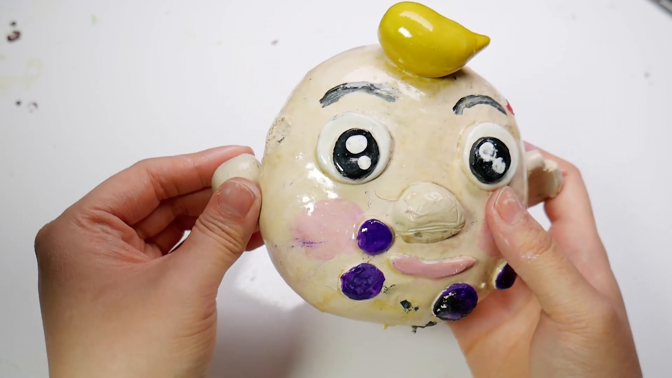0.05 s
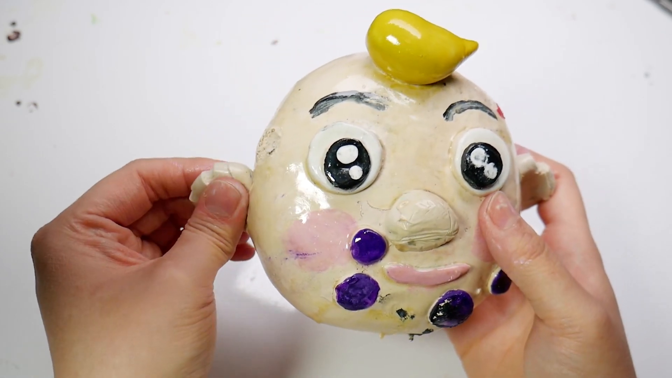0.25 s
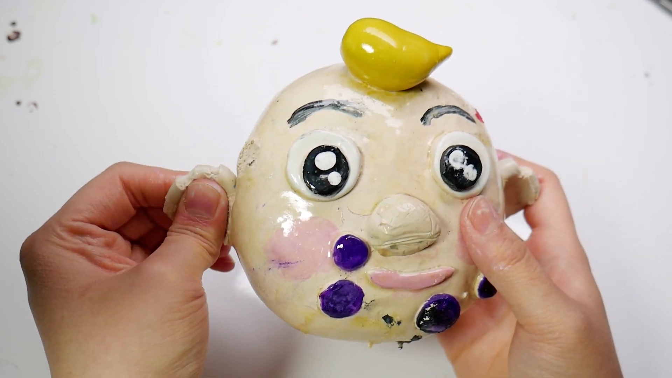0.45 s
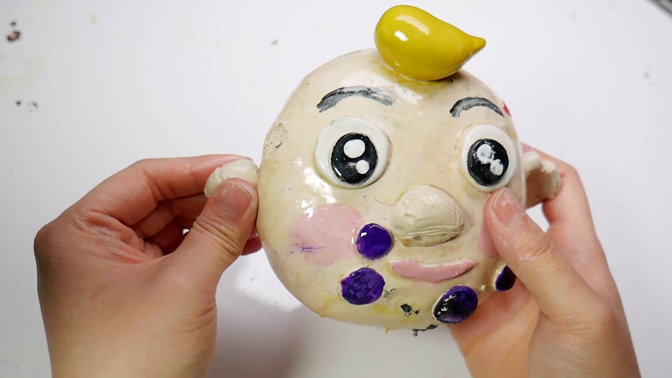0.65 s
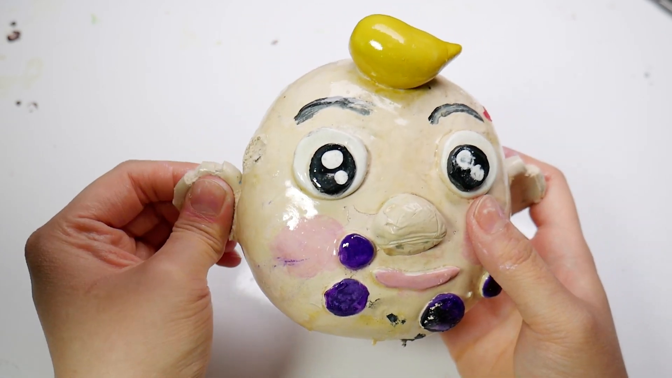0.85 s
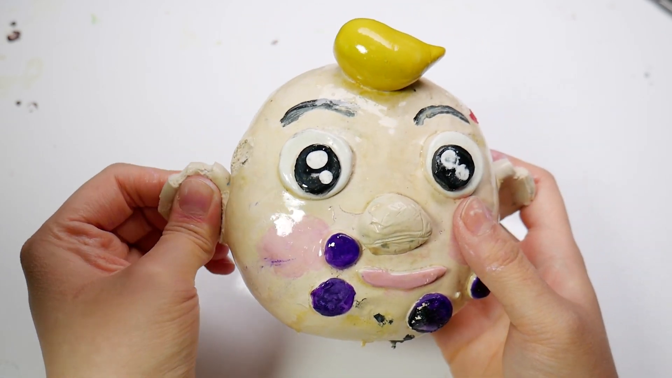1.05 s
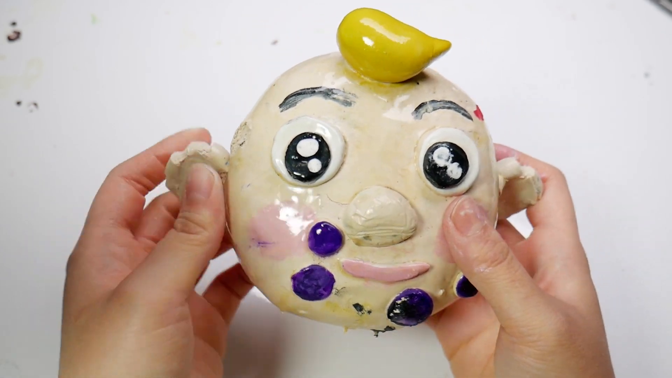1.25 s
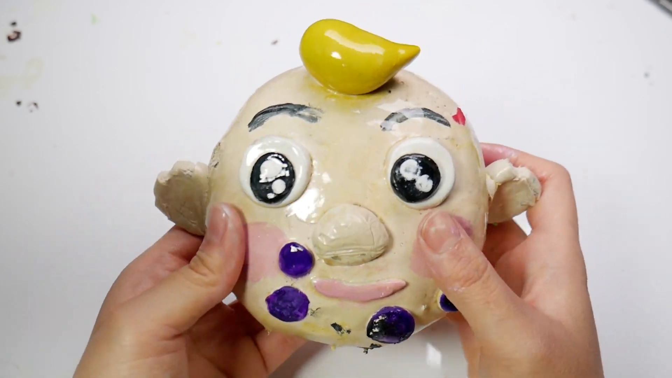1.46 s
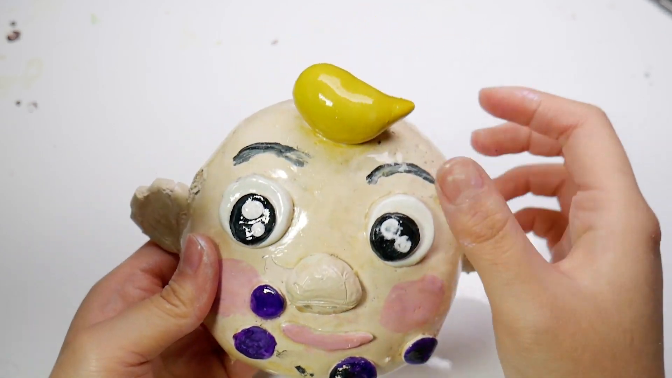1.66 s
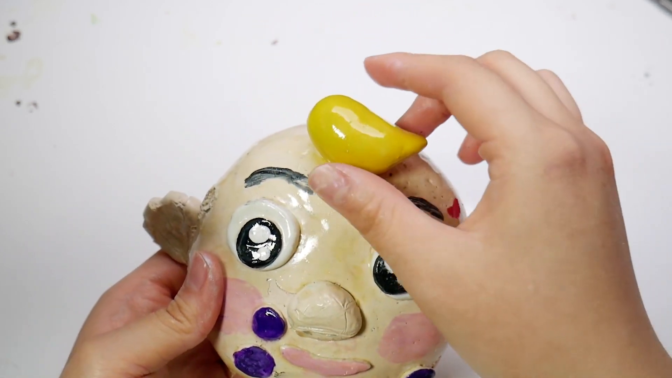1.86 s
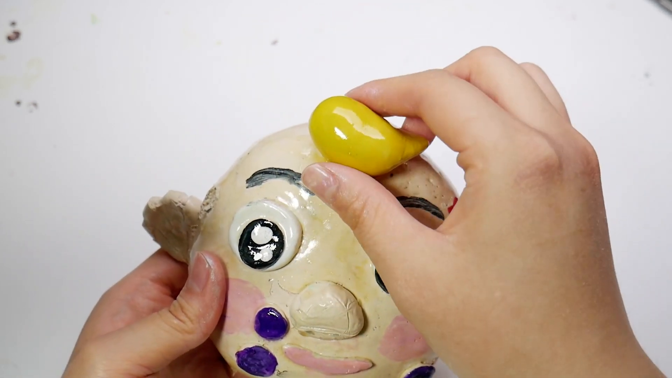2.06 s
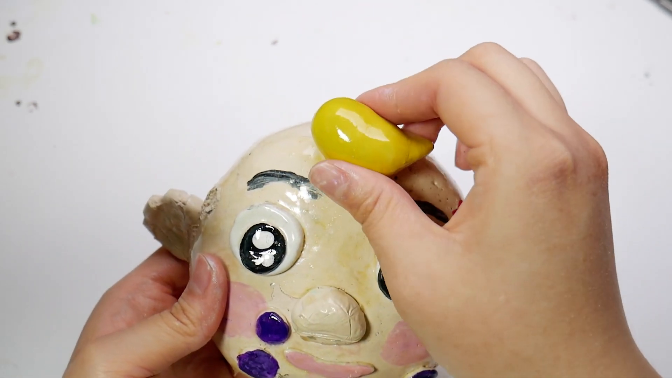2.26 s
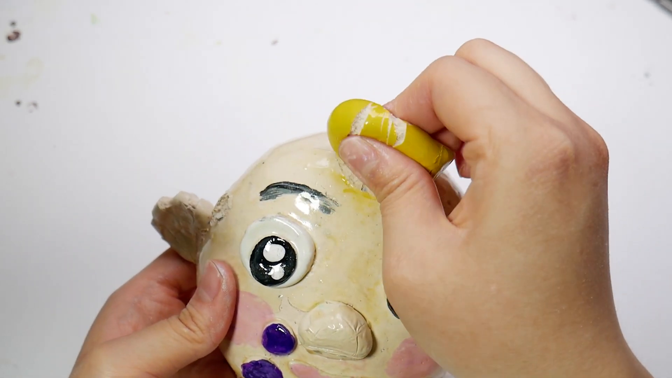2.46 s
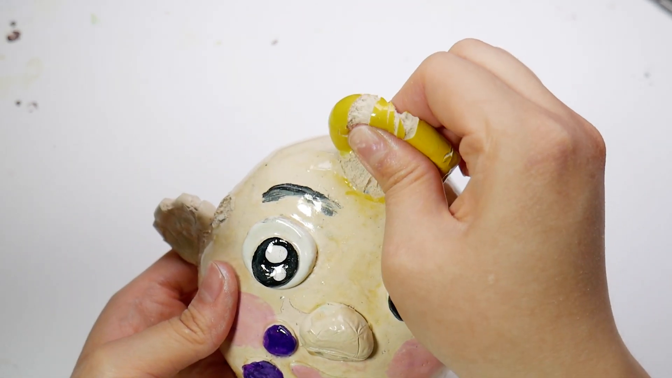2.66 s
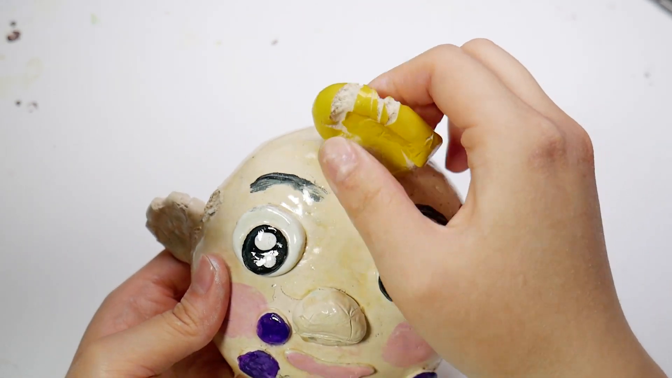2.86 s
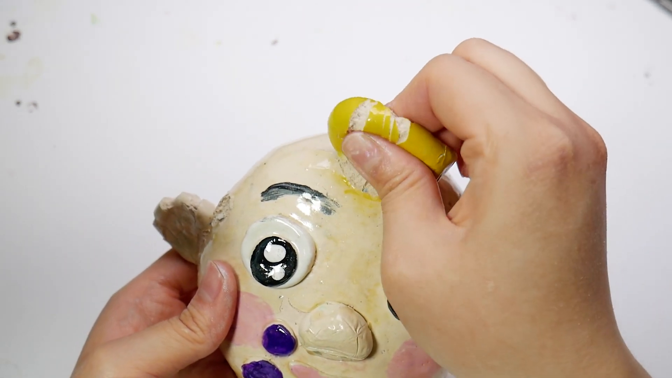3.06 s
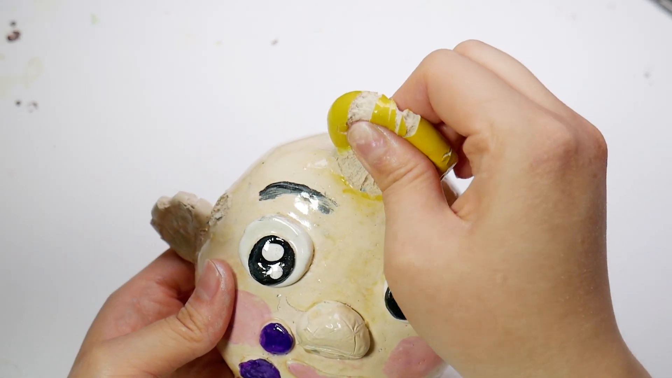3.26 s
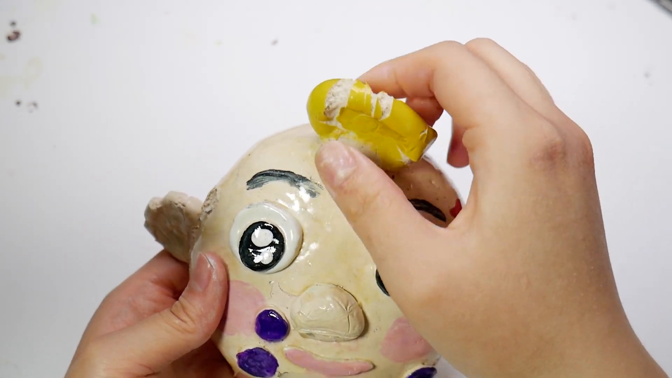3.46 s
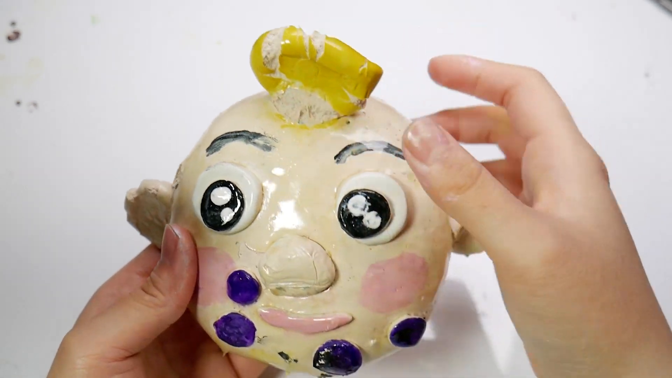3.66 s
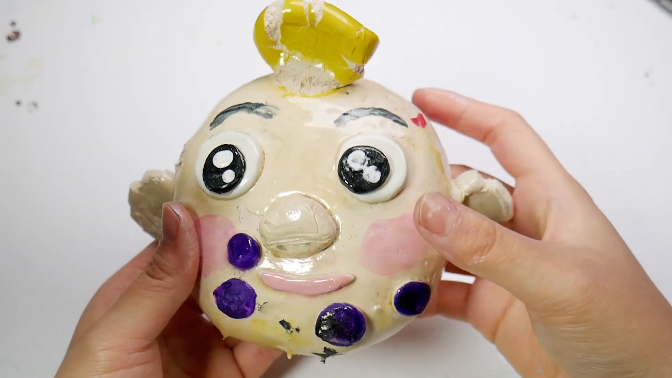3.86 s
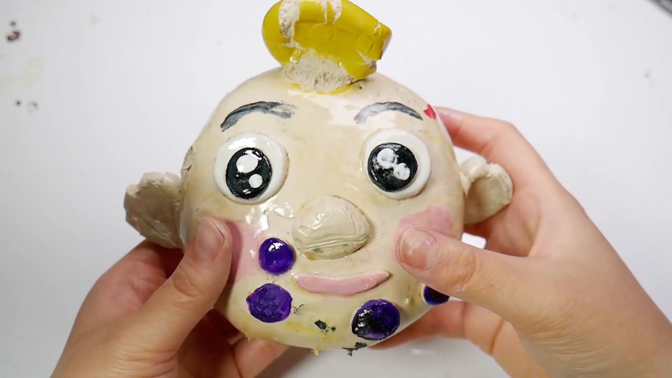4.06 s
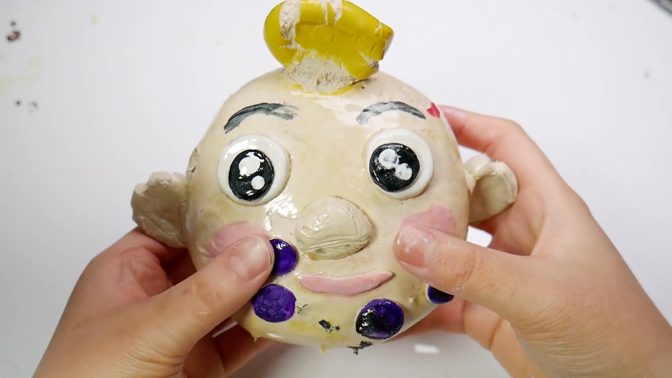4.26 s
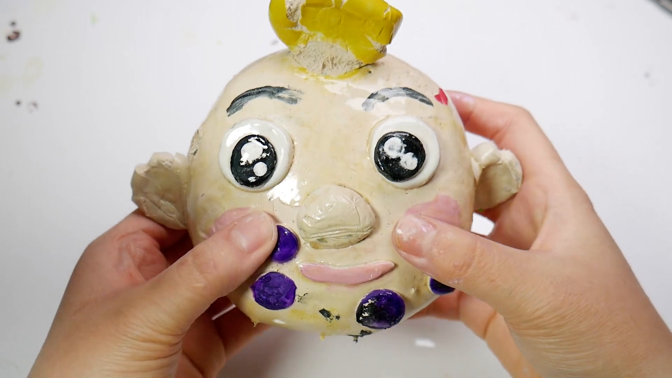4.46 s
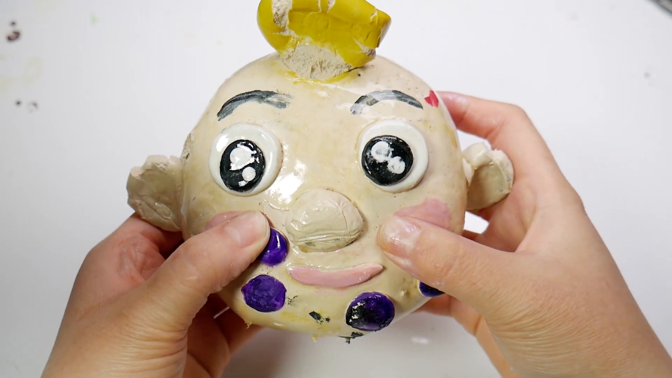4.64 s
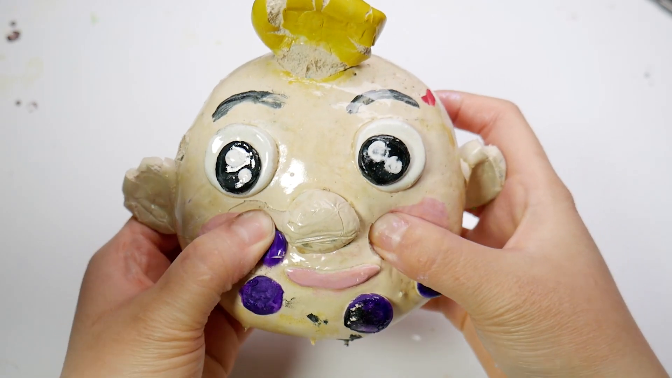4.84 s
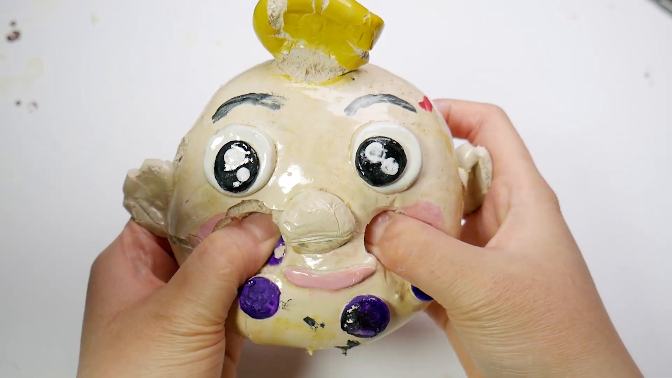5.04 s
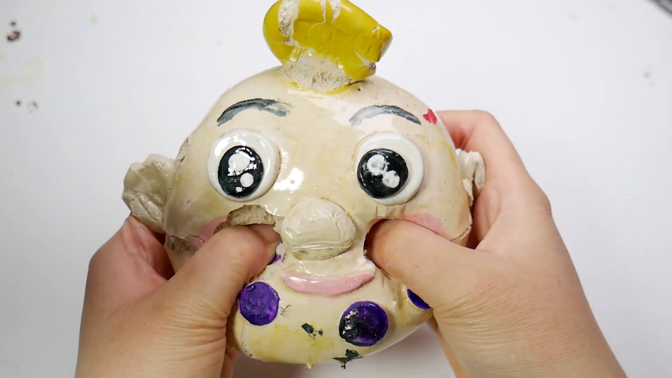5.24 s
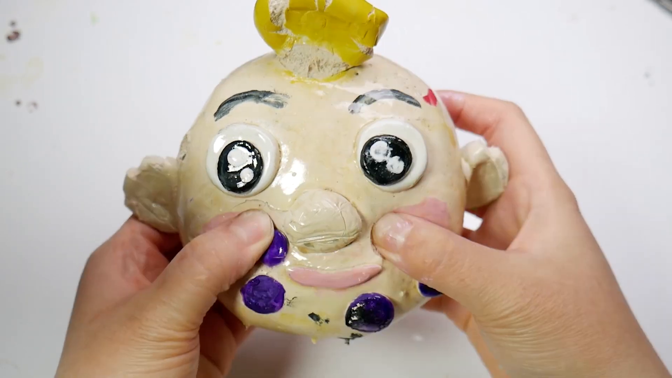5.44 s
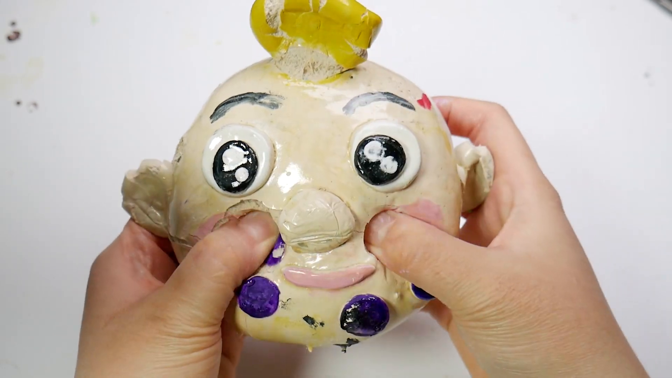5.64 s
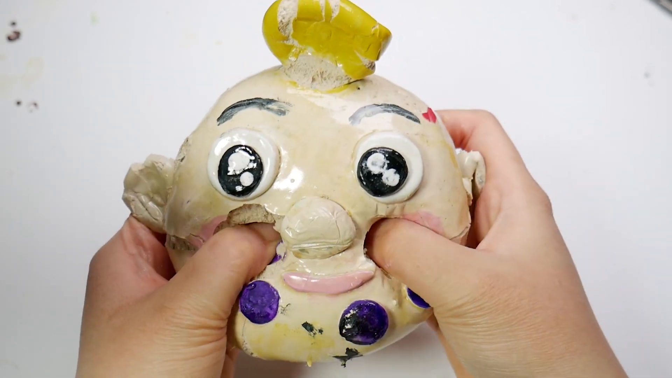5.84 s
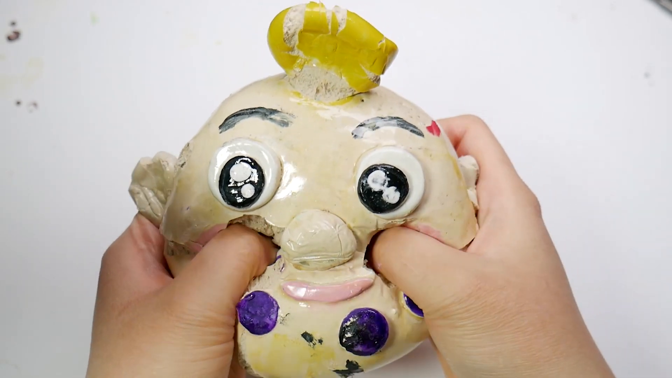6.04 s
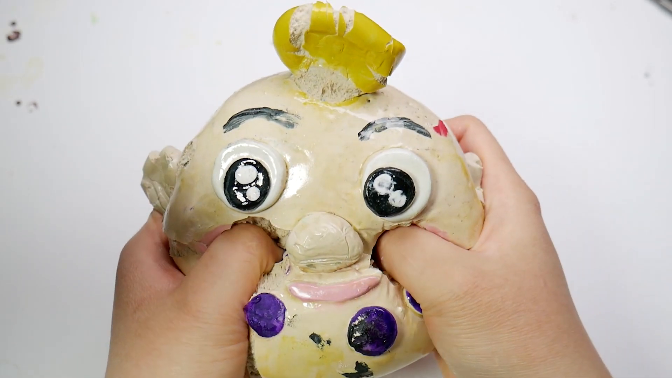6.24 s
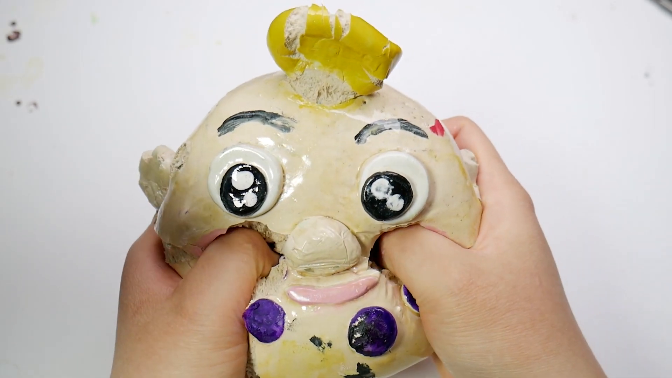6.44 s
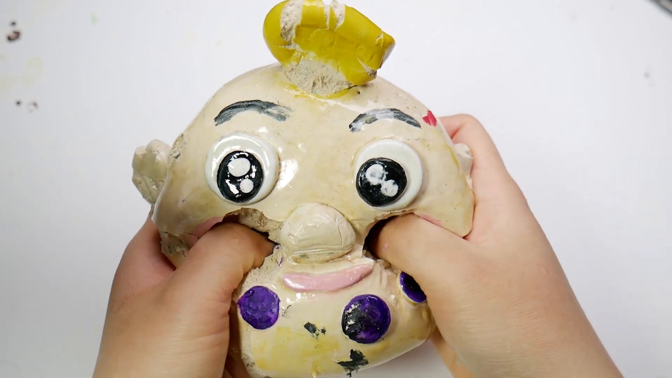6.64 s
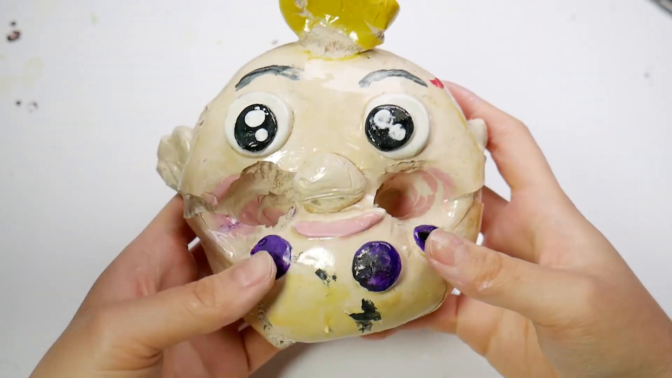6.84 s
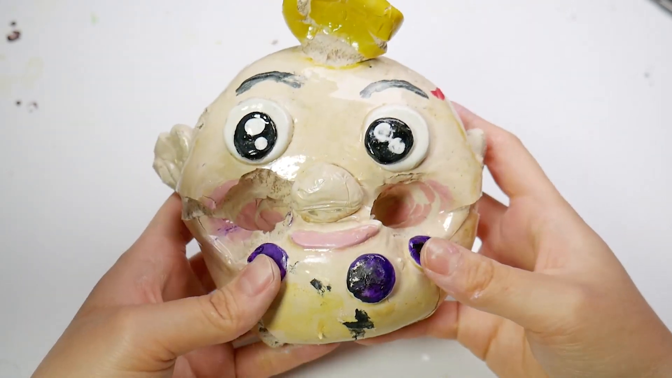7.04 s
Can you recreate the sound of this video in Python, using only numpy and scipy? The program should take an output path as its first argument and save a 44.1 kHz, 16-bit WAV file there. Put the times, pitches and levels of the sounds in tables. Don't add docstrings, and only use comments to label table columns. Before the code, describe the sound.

Brittle clay cracks right at the microphone, dry and overloaded at the loudest snaps. Two bursts of crisp crunching, the second heavier, are separated by small clicks and soft thuds. A quieter stretch of handling and low room hiss follows, then a long, dense crunch with woody, hollow knocks from the softer core, a brief pause, another crackling burst and sparse ticking crumbs.

```python
import sys
import numpy as np
from scipy import signal
from scipy.fft import rfft, irfft
from scipy.io import wavfile
from scipy.ndimage import uniform_filter1d

SR = 44100
rng = np.random.default_rng(int(sys.argv[2]) if len(sys.argv) > 2 else 0)


def attenuation_scalar(level_db):
    decades = np.asarray(level_db, float) / 20
    return 10 ** decades


def pcm_store(signal):
    levels = np.round(np.clip(np.atleast_2d(signal), -1, 1) * 32767)
    wavfile.write(sys.argv[1], SR, levels.astype(np.int16).T)


N = 313110
T = np.arange(N) / SR
HOLLOW_HZ, HOLLOW_WIDTH_HZ = 830, 130


def band(x, hz, width):
    return signal.lfilter(*signal.iirpeak(hz, hz / width, fs=SR), x)


def body(x, modes):
    return sum((-1) ** k * attenuation_scalar(db) * band(x, hz, width) for k, (hz, width, db) in enumerate(modes))


def treble(x, hz):
    return signal.sosfilt(signal.butter(N=3, Wn=hz, btype="high", fs=SR, output="sos"), x)


def unit(x):
    return x / np.sqrt(np.mean(x ** 2))


def top(x):
    return x / np.max(np.abs(x), axis=-1, keepdims=True)


def fade(t, t60):
    return np.exp(-np.log(1000) * t / t60)


def add_at(starts_s, sounds):
    size = sounds.shape[-1]
    out = np.zeros(N + size)
    places = (starts_s * SR).astype(int)[:, None] + np.arange(size)
    np.add.at(out, places, sounds)
    return out[:N]


# pitch_hz, density_db (per Hz)
AIR = [(28, -23), (60, -9), (130, 0), (200, -8), (300, -4), (500, -14.5), (3300, -16.5), (9000, -34.5)]
# start_s, level_db
AIR_DB = [
    (0, -51),
    (3.45, -54.5),
    (3.55, -56.5),
    (7.1, -51),
]


def air():
    hz = np.maximum(np.fft.rfftfreq(N, 1 / SR), 1)
    colour_hz, colour_db = np.transpose(AIR)
    colour = attenuation_scalar(np.interp(np.log(hz), np.log(colour_hz), colour_db))
    tone = unit(irfft(rfft(rng.standard_normal(N)) * colour, N))
    hiss = rng.standard_normal((2, N))
    return (tone + hiss) * attenuation_scalar(np.interp(T, *np.transpose(AIR_DB)))


# start_s, thump_db (at a 0 dB crack), grit_db and core_db (over the shell)
GRIPS = [(0, -18, 0, -6), (.35, -25, -2, -11), (1.09, -19, 5, -8), (1.265, -11, 2, -2), (1.42, -8, -4, -3),
         (1.63, -8, -15, -8), (2.3, -21, -2, -14), (2.59, -29, 5, -15), (2.72, -22, 4, -7),
         (3.49, -8, -18, -14), (3.7, -8, -3, -4), (4.5, -15, -8, -4), (4.69, -26, -8, -4),
         (4.78, -22, -6.5, 0), (6.08, -26, -5, -2), (6.14, -26, 1, 0), (6.56, -14, 1, 0),
         (6.62, -14, -7, -5), (6.86, -12, -22, -1)]


def grip(s):
    table = np.array(GRIPS)
    row = np.maximum(np.searchsorted(table[:, 0], s) - 1, 0)
    return table[row, 1:].T


def thumps_db():
    s, shard_db, hz, _ = CRACKS.T
    return grip(s)[0] + 1.05 * shard_db - 2.5 * np.log2(hz / 2800)


# pitch_hz, width_hz, level_db
SHELL = [(1944, 1190, 4.5), (2856, 730, 4), (3450, 630, 2), (4530, 5400, -4)]
# pitch_hz, width_hz, level_db
CORE = [(97, 233, -12), (312, 336, -2.5), (518.5, 279, 0.5), (860, 400, -2.5)]


def fracture(shard_db, hz, snap_db, thump_db, chance):
    t = np.arange(chance.shape[-1]) / SR
    size = attenuation_scalar(0.74 * shard_db)
    kick = t == 0
    run = chance[0] * fade(t, 0.007 * size) + 4.0 * kick
    ring = np.array([band(r, f, f / 3.9) for r, f in zip(run, hz)])
    shard = top(ring) + 0.33 * top(body(run, SHELL))
    shard = treble(shard, 1000)
    burst = chance[1] * fade(t, 0.003 * size + 0.0012)
    snap = treble(band(burst, 8500, 15000), 5100)
    thump = body(chance[2] * fade(t, 0.0054) + 3.3 * kick, CORE)
    return attenuation_scalar(shard_db) * top(shard) + attenuation_scalar(thump_db) * top(thump) + attenuation_scalar(snap_db) * top(snap)


# start_s, shard_db (peak), ring_hz, snap_db (peak)
EAR = [(.1512, -1, 4340, -1), (.1897, 6, 3770, 4.5), (.201, -6, 3350, 6), (.2112, -3, 3600, 4),
       (.2088, -8, 3600, -4), (.217, -20, 3600, -9), (.2288, -11, 3600, -15), (.251, -3, 3100, 4),
       (.2614, -6, 3450, 8), (.271, -17, 5700, 4), (.2797, -15, 3300, -7), (.283, -2.5, 3450, 8.5),
       (.2912, -10, 2610, 0), (.2939, -6, 3700, -33), (.3032, 1, 3330, 1), (.3219, -7, 3300, 8),
       (.3449, -1, 3300, 5), (.3553, -12, 3320, -6), (.359, -7, 3620, 1), (.392, -35, 3510, -4),
       (.3945, -11, 3470, -2), (.4014, -22, 3420, -1.5), (.403, -12, 3490, -5), (.4258, -16, 3510, -9),
       (.4308, 2, 3450, 6), (.449, -32, 3150, -10), (.4655, -18, 3450, -3), (.4815, -6.5, 2650, 8),
       (.5118, -16.5, 2690, -2.5), (.5348, -40, 3530, -20)]
# start_s, shard_db, ring_hz, snap_db
HANDLING = [(1.1206, -18, 3700, -11.5), (1.2035, -35, 5640, -23), (1.2329, -30, 4780, -20),
            (1.2394, -27, 2610, -10), (1.2722, -12, 5300, -14), (1.2811, -12, 4350, -6),
            (1.2842, -7, 5100, 1.5), (1.3308, -4, 5360, -1), (1.4577, -17, 3370, -22),
            (1.4699, -16.5, 1610, -16), (1.4958, -23, 2070, -41), (1.5293, -8.5, 1600, -34),
            (1.5489, -16, 2170, -22), (2.3147, -33, 1810, -36)]
# start_s, shard_db, ring_hz, snap_db
TUFT = [(2.3425, -19, 3190, -14), (2.3475, -9, 1820, -1), (2.362, -3.5, 1920, 5), (2.3755, -16, 2070, -10),
        (2.3845, 11.5, 1870, 5), (2.4029, 8.5, 1870, 6.5), (2.4386, 1.5, 1800, 4), (2.452, -8, 4720, -12),
        (2.4549, 9, 3070, 3), (2.4656, 4.5, 3150, 4.5), (2.4693, 6, 3960, 8), (2.477, -1, 1820, -14),
        (2.4811, 0, 3300, -25), (2.4845, -2, 3340, -7.5), (2.492, 0, 1864, 2), (2.5019, -1.5, 1980, -4),
        (2.5224, -7, 3214, -5.5), (2.5417, -14, 3680, -15.5), (2.56, 6, 3200, 6.5), (2.5624, 5, 3700, -10),
        (2.5669, 0, 3300, 2.5), (2.5692, -16, 4400, 8)]
# start_s, shard_db, ring_hz, snap_db
TUFT_SETTLES = [(2.6028, -6, 1900, -11), (2.6069, -6, 1870, -1), (2.6224, -7, 3320, -1),
                (2.629, 1, 3000, -8), (2.649, -7, 1900, -11), (2.655, -10, 3240, -18),
                (2.67, -11.5, 3250, -10), (2.6799, -16, 3250, -16), (2.737, -1.5, 3030, -2),
                (2.7923, -25, 2170, -21), (2.8156, -2, 1950, -16), (2.8452, -20.5, 3250, -27),
                (2.8758, -21, 3470, -23), (2.89, -12, 3750, -15.5), (2.8929, -5.5, 3290, -4),
                (2.918, -14, 3420, -24)]
# start_s, shard_db, ring_hz, snap_db
REGRIP = [(3.875, -28.5, 1200, -54), (3.9648, -22.5, 3380, -45), (3.9784, -19.5, 2950, -44),
          (4.0823, -15, 3040, -15.5), (4.1374, -16, 2200, -17), (4.2319, -37, 1380, -32),
          (4.2733, -10, 2676, -11), (4.6031, -25.5, 1700, -23.5), (4.6602, -8, 1540, -21)]
# start_s, shard_db, ring_hz, snap_db
CHEEKS = [(4.7109, 3, 2300, -8), (4.75, -15.5, 1890, -20), (4.754, 6, 1700, -3), (4.7955, 7, 1700, 5),
          (4.8042, 5.5, 3280, -10), (4.8245, 2, 3140, -6), (4.8414, 1, 1770, -21), (4.8451, -7.5, 1810, -4),
          (4.8484, -2, 2110, -28), (4.8627, -1, 1870, 0), (4.8712, -1.5, 3300, -2),
          (4.8946, -2, 3240, -10.5), (4.899, 1.5, 1720, -8), (4.9007, 10, 2230, 1.5),
          (4.9172, 0, 3560, -7.5), (4.9261, 0, 2930, -15), (4.9361, 6, 2400, 0), (4.95, -1, 3450, -14.5),
          (4.9546, 4.5, 3470, -7), (4.965, 1.5, 1694, -4.5), (4.973, 3, 2580, -2), (4.9849, 7, 3180, 6),
          (4.994, 7.5, 2230, -2), (4.9975, 3.5, 2100, 6), (5.0092, 0, 3620, -6.5), (5.0206, 4, 1770, -2),
          (5.0287, 4.5, 2610, -4.5), (5.0316, -3.5, 2360, -2)]
# start_s, shard_db, ring_hz, snap_db
CHEEKS_SINK = [(5.0575, -6.5, 1670, -6), (5.0753, 8, 2355, -7.5), (5.0915, -3, 3200, -15),
               (5.0984, 9, 2540, 9), (5.1392, 8.5, 2440, -1.5), (5.156, -6, 3360, -8), (5.169, 3, 1700, -4),
               (5.1758, 10.5, 2580, -10.5), (5.1965, -5, 3680, -8), (5.2138, -7, 2600, -16),
               (5.2445, -3, 2300, -8), (5.2302, 4.5, 2750, -12.5), (5.2341, -1, 2900, -8),
               (5.2592, 2, 2750, -3), (5.2832, -5, 4760, -12), (5.2945, 3, 2500, -2), (5.3016, 2, 2230, 10),
               (5.305, -2, 2000, -6), (5.3255, -1, 1225, -6.5), (5.3371, -10, 3520, -31),
               (5.3603, -6, 3520, -7), (5.431, -10, 3080, -14), (5.435, 6.5, 2670, -10),
               (5.4478, -4, 3710, 0)]
# start_s, shard_db, ring_hz, snap_db
RELEASE = [(6.1159, -18, 1230, -13), (6.1329, -11, 2840, -18), (6.145, 0, 2900, -4), (6.1522, -1, 1280, -3),
           (6.1646, 3.5, 2600, -1), (6.1757, -4, 3060, -14), (6.191, 1, 2900, -14), (6.1944, 3, 3030, -10),
           (6.2437, 4, 3450, 4), (6.2576, -5.5, 1730, -8), (6.2771, -7, 3450, -4.5), (6.3137, -1, 3040, -3),
           (6.349, -5.5, 3180, -12), (6.355, -4.5, 2280, -4), (6.3683, -6, 2820, -11),
           (6.3756, -3, 3450, -10), (6.395, -17, 1210, -18), (6.4163, -17, 3140, -19),
           (6.4429, -9, 2670, -8.5), (6.4488, -4, 3050, -6), (6.4555, -7, 3250, -18), (6.4723, -6, 3350, 1),
           (6.5187, -3, 3860, -1), (6.5803, -13, 2700, -11), (6.7059, -15.5, 3600, -22),
           (6.7254, -12, 2700, -24), (6.7435, -17, 1790, -42), (6.5965, -27, 2500, -40),
           (6.684, -19, 3100, -34), (6.7885, -24, 4000, -36), (6.8915, -15, 2300, -30),
           (7.0454, -17, 1690, -21.5)]
# start_s, shard_db, ring_hz,
# snap_db
MORE_CRACKS = [(0.1512, -1, 4590, -10), (0.2088, -25, 3850, 1), (0.2289, -24, 3570, -3),
               (0.2741, -11, 3550, -7), (0.2938, -18, 4690, -1), (0.3535, -14, 3570, -6),
               (0.4009, -3, 3420, -10), (0.4038, 0, 3470, 0), (0.4518, -28, 3600, -7),
               (1.2122, -55, 4670, -27), (1.2352, -33, 2260, -17), (1.2584, -29, 4290, -16),
               (1.5892, -40, 5490, -24), (2.377, -6, 2070, -4), (2.3801, -15, 3270, -6),
               (2.4406, -15, 3400, -3), (2.4454, -5, 3940, -25), (2.4699, 2, 4090, -5), (2.474, -1, 2090, -2),
               (2.4962, -23, 5340, -8), (2.5321, -12, 2200, -13), (2.7774, -31, 2200, -23),
               (2.829, -20, 2170, -16)]
# start_s, shard_db, ring_hz, snap_db
LATE_MORE_CRACKS = [(3.8352, -37, 2780, -38), (4.0321, -38, 4110, -33), (4.7161, -25, 3550, -13),
                    (4.7276, -15, 1510, -27), (4.8058, -6, 3340, -1), (4.8206, -2, 3290, -14),
                    (4.8484, 1, 2090, -1), (4.8737, -24, 2890, -1), (4.9012, -6, 2110, 2),
                    (4.9215, -18, 3750, -4), (4.9417, -3, 3570, -6), (4.9465, -7, 1720, -15),
                    (4.9773, 3, 2130, -1), (4.9803, -2, 3450, -7), (5.0091, 1, 3040, 0),
                    (5.0169, -5, 1720, -12), (5.0343, -4, 2690, -14), (5.1224, -5, 3210, -15),
                    (5.1585, -7, 2260, -2), (5.1718, 3, 3420, -13), (5.2524, -9, 1310, -18),
                    (5.3018, 1, 2170, -7), (5.3313, -4, 1310, -23), (5.3366, -5, 3660, -7),
                    (5.3567, -14, 3140, -30), (5.4091, -25, 1310, -19), (6.1716, 0, 2710, 0),
                    (6.2626, -12, 3380, -9), (6.3893, -23, 4570, -14), (6.4571, -10, 3250, -13),
                    (6.5183, -2, 3770, -12), (6.5243, -15, 3140, -17), (6.5399, -26, 4690, -24)]
CRACKS = np.array(EAR + HANDLING + TUFT + TUFT_SETTLES + REGRIP + CHEEKS + CHEEKS_SINK + RELEASE
                  + MORE_CRACKS + LATE_MORE_CRACKS)


def fractures(size=1100):
    s, shard_db, hz, snap_db = CRACKS.T
    chance = rng.standard_normal((3, len(s), size))
    return add_at(s, fracture(shard_db[:, None], hz, snap_db[:, None], thumps_db()[:, None], chance))


# start_s, hold_s, shell_db, rise_s and fall_s (per 60 dB)
SQUEEZES = [(.184, .25, -35, .035, .3), (1.275, .01, -40, .3, .37), (1.54, .01, -38, .35, .09),
            (1.592, .01, -36, .06, .1), (1.62, .34, -52, .1, .3), (2.05, .01, -43, .45, .36),
            (2.39, .01, -13, .045, .38), (2.575, .01, -29.5, .2, .27), (2.9, .01, -35, .48, .07),
            (3.54, .01, -44.5, .6, .1), (3.91, .01, -41, .17, .18), (4.08, .1, -47, .9, .7),
            (4.76, .3, -28, .13, .9), (5.2, .01, -20, .8, .9), (6.08, .01, -23, .1, .6),
            (6.45, .2, -46, .5, .5), (6.718, .01, -29, .32, .43), (6.888, .01, -32, .11, .13),
            (7.05, .01, -37, .04, .15)]


def pressure(size=32):
    s, hold, db, rise, fall = np.transpose(SQUEEZES)[:, :, None]
    t = T[::size]
    each = attenuation_scalar(db) * fade(np.maximum(s - t, 0), rise) * fade(np.maximum(t - s - hold, 0), fall)
    return np.interp(T, t, np.sqrt(np.sum(each ** 2, axis=0)))


def power_tail(power, t60):
    return signal.lfilter([1], [1, -fade(2 / SR, t60)], power)


def aftermath(s, peaks_db, t60):
    power = np.zeros(N)
    np.add.at(power, (s * SR).astype(int), attenuation_scalar(2 * peaks_db))
    creak = power_tail(power[::-1], .011)[::-1]
    return np.sqrt(power_tail(power, t60) + attenuation_scalar(2 * -4) * creak)


def grit(rate, spread_db, smooth):
    sizes = attenuation_scalar(spread_db * np.minimum(rng.exponential(size=N), 1.5))
    sizes = sizes * np.clip(rng.standard_normal(N), -1.8, 1.8)
    breaks = unit(sizes * (rng.random(N) < rate / SR))
    return unit(breaks + smooth * rng.standard_normal(N))


def tint(breaks):
    colour_db = 2.5 * np.repeat(rng.standard_normal(N // 64 + 1), 64)[:N]
    return breaks * attenuation_scalar(colour_db)


def crumbs():
    shell = pressure()
    bright, core = shell * attenuation_scalar(grip(T)[1:])
    s, shard_db, _, snap_db = CRACKS.T
    knock_s, knock_db, _ = np.transpose(KNOCKS + LATE_KNOCKS)
    shell = shell + attenuation_scalar(-21) * aftermath(s, shard_db, 0.061)
    bright = bright + attenuation_scalar(-21.5) * aftermath(s, snap_db, 0.032)
    core = core + attenuation_scalar(-17.5) * aftermath(s, thumps_db(), 0.037)
    core = core + attenuation_scalar(-17.5) * aftermath(knock_s, knock_db, 0.037)
    breaks = grit(1600, 3.5, 0.6)
    shards = sum((-1) ** k * body(tint(breaks), [mode]) for k, mode in enumerate(SHELL))
    lump = body(tint(breaks), CORE + [(HOLLOW_HZ, HOLLOW_WIDTH_HZ, 1.5)])
    head = band(tint(breaks), 3450, 520)
    sparkle = treble(band(tint(breaks), 5700, 11000), 5800)
    low = shell * unit(treble(shards, 1100)) + core * unit(lump) + attenuation_scalar(-9) * shell * unit(head)
    return low + bright * unit(sparkle)


def room(x):
    t = np.arange(int(.3 * SR)) / SR
    echoes = rng.standard_normal(len(t)) * fade(t, .18) * (t > .002)
    tail = band(echoes, 2400, 5600)
    return signal.fftconvolve(x, tail / np.sqrt(np.sum(tail ** 2)))[:N]


# start_s, level_db (peak), pitch_hz
THUDS = [(1.282, -25, 181), (1.3315, -19, 520), (1.469, -21, 175), (1.4585, -29, 200), (1.531, -27, 120),
         (2.126, -29, 480), (2.892, -31.5, 100), (3.877, -31.5, 104), (3.965, -34, 170), (6.743, -22, 450),
         (6.797, -31, 300), (6.772, -33, 300), (6.869, -23, 560), (6.891, -24, 600), (7.015, -37, 390)]


def thuds(size=3500):
    out = np.zeros(N)
    for s, db, hz in THUDS:
        push = rng.standard_normal(size) * fade(T[:size], 7.0 / hz)
        jolt = band(band(push, hz, 1.64 * hz), hz, 1.64 * hz)
        i = int(s * SR)
        out[i:i + size] += attenuation_scalar(db) * top(jolt)
    return out


# start_s, level_db (peak), ring_hz
KNOCKS = [(4.7107, -14, 410), (4.7539, -10, 800), (4.7957, -6, 370), (4.805, -8, 830), (4.8094, -12, 800),
          (4.8235, -14, 980), (4.8428, -12, 1100), (4.8468, -15, 470), (4.8941, -7, 920), (4.9019, 0, 860),
          (4.9097, -14, 760), (4.9176, -12, 700), (4.9268, -12, 1060), (4.9376, -6, 710), (4.9487, -6, 750),
          (4.9554, -9, 840), (4.9647, -7, 780), (4.969, -13, 1040), (4.9736, -2, 830), (4.9852, -6, 610),
          (4.9937, -4, 900), (4.9979, 0, 390), (5.0015, -9, 830), (5.0089, -9, 880), (5.0142, -14, 550),
          (5.02, -6, 1100), (5.0274, -15, 560), (5.0311, -15, 970), (5.0573, -11, 950), (5.0757, -4, 810),
          (5.0795, -6, 790), (5.0922, -8, 730), (5.1006, -5, 890), (5.1383, -8, 730), (5.1695, -2, 860),
          (5.1757, -3, 470), (5.181, -12, 760), (5.1855, -14, 500), (5.2136, -15, 750), (5.2296, -4, 480),
          (5.2513, -15, 640), (5.2595, -4, 520), (5.2796, -12, 640), (5.2949, -5, 460), (5.306, -10, 320),
          (5.3251, -3, 610), (5.435, -6, 460), (5.4462, -12, 410)]
# start_s, level_db (peak), ring_hz
LATE_KNOCKS = [(6.1321, -18, 430), (6.1457, -23, 440), (6.152, -3, 520), (6.1571, -22, 740),
               (6.1648, -12, 590), (6.1714, -14, 520), (6.1751, -23, 850), (6.1931, -17, 920),
               (6.2449, -18, 900), (6.258, -15, 460), (6.3134, -12, 610), (6.3489, -23, 800),
               (6.3545, -15, 960), (6.3686, -16, 500), (6.3763, -21, 410), (6.4426, -23, 660),
               (6.4487, -19, 530), (6.457, -22, 600), (6.4721, -20, 580), (6.5183, -11, 510)]


def knocks(size=900):
    s, db, hz = np.transpose(KNOCKS + LATE_KNOCKS)
    t = T[:size]
    blow = rng.standard_normal((len(s), size)) * fade(t, .004) + 4.0 * (t == 0)
    ring = top(np.array([band(b, f, f / 1.8) for b, f in zip(blow, hz)]))
    ring = ring + .45 * top(body(blow, CORE))
    ring = ring - .4 * top(band(blow, 1250, 600)) + .25 * top(band(blow, 290, 160))
    ring = ring + .45 * top(band(blow, HOLLOW_HZ, HOLLOW_WIDTH_HZ)) + .2 * top(band(blow, 110, 160))
    return add_at(s, attenuation_scalar(1.15 * db)[:, None] * top(ring))


def scene():
    clay = attenuation_scalar(-0.5) * fractures() + attenuation_scalar(-4.0) * crumbs() + attenuation_scalar(6.5) * knocks()
    clay = clay + 0.5 * band(clay, 3300, 410)
    return clay + attenuation_scalar(-19) * room(clay) + thuds() + air()


def stereo_haze(x, size=1024):
    side = 0
    wide = rng.random(N // size + 1) < .3
    for hz in 70 * 1.8 ** np.arange(10):
        level = np.sqrt(np.abs(uniform_filter1d(band(x, hz, hz / 1.5) ** 2, size)))
        patch = np.repeat(wide | (rng.random(len(wide)) < .2), size)[:N]
        gate = uniform_filter1d(1. * patch, size // 2)
        noise = unit(band(band(rng.standard_normal(N), hz, hz / 2.5), hz, hz / 2.5))
        side = side + gate * level * noise * (hz / 3000) ** .15
    return side * np.array([[1], [-1]])


def low_pass(x):
    return signal.sosfilt(signal.butter(12, 16930, fs=SR, output="sos"), x)


# start_s, delay_s, length_s
REPLAYS = [
    (.13, .47905, .479),
    (2.381, .55887, .558),
    (4.815, .63871, .629),
]


def record(dry):
    cut = signal.ellip(N=10, rp=.1, rs=60, Wn=15900, fs=SR, output="sos")
    x = np.clip(dry, -1.03, 1.03)
    x = signal.sosfiltfilt(cut, x + attenuation_scalar(-19) * stereo_haze(x.mean(axis=0)))
    for i, lag, n in np.round(np.array(REPLAYS) * SR).astype(int):
        x[:, i + lag:i + lag + n] = x[:, i:i + n].copy()
    return low_pass(np.clip(x, -1, 1))


dry = scene()
out = record(dry)
pcm_store(out)
```